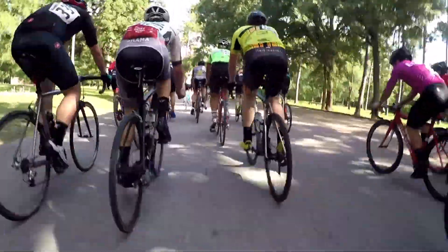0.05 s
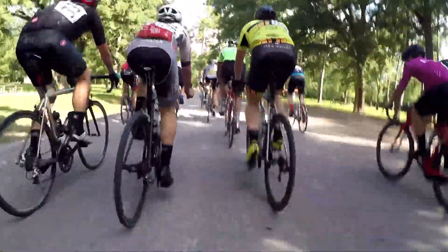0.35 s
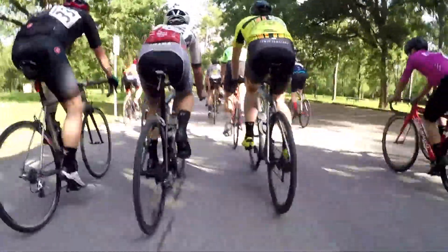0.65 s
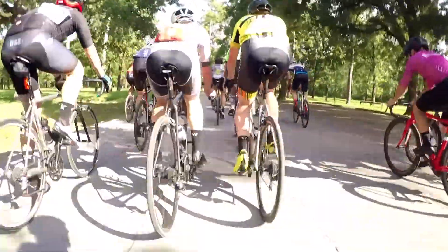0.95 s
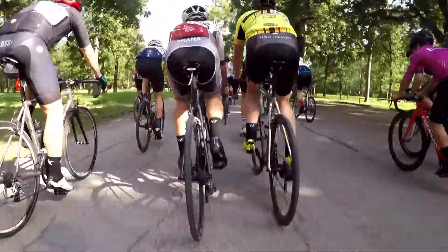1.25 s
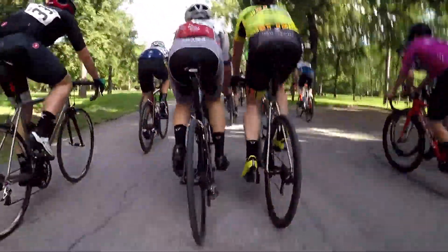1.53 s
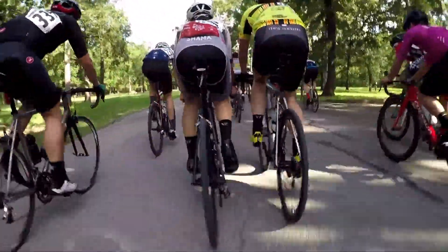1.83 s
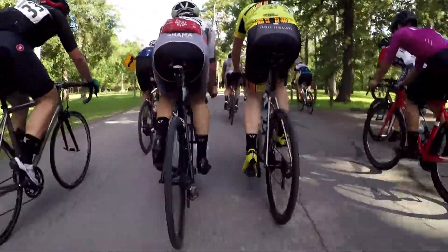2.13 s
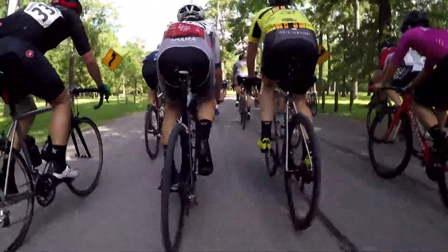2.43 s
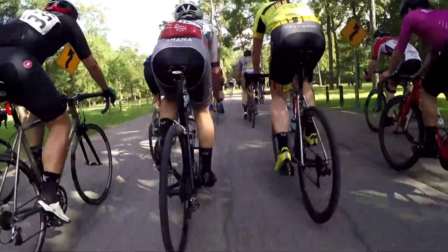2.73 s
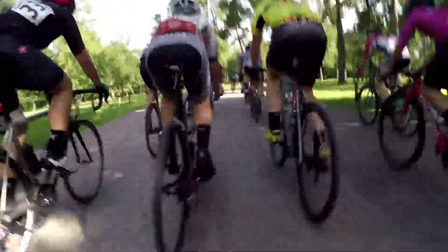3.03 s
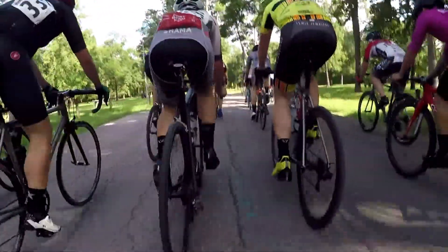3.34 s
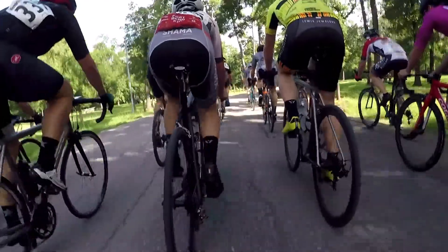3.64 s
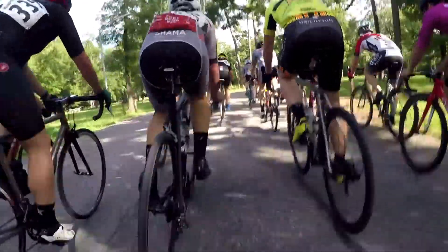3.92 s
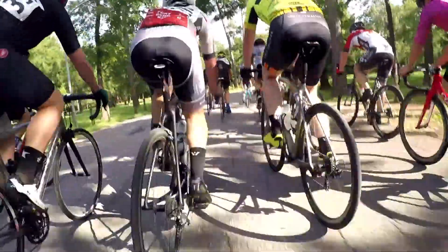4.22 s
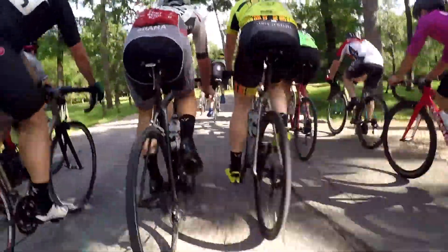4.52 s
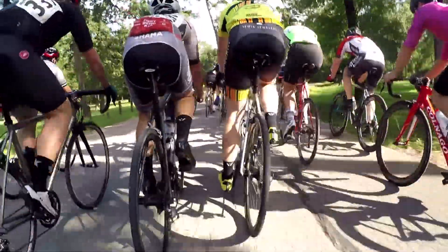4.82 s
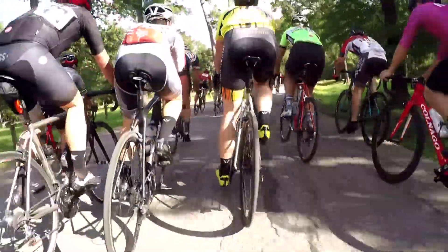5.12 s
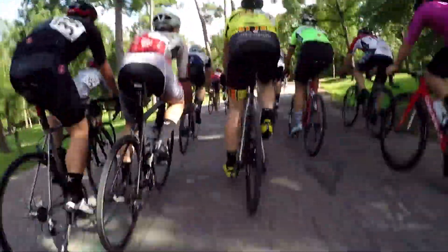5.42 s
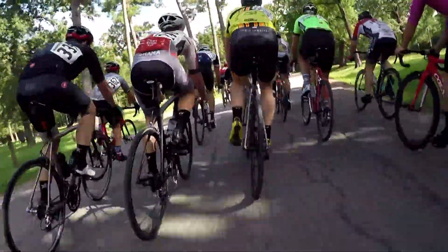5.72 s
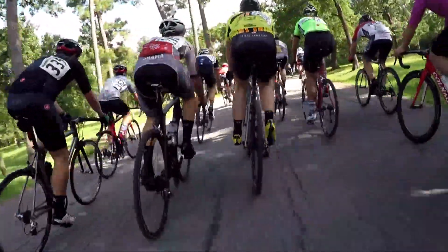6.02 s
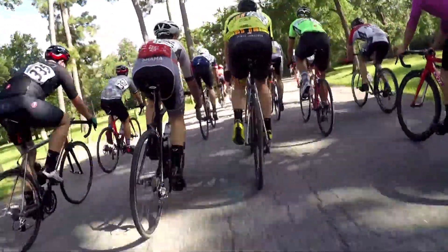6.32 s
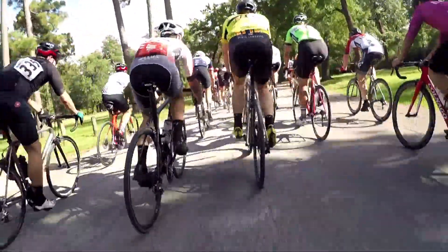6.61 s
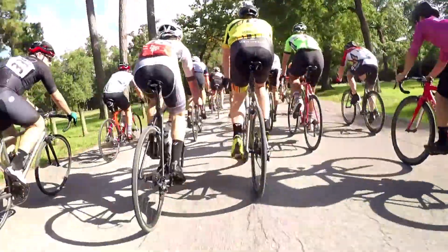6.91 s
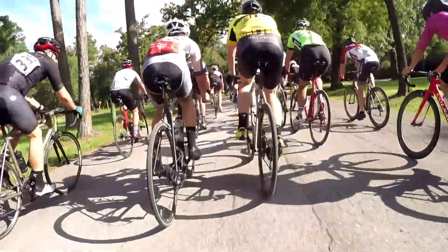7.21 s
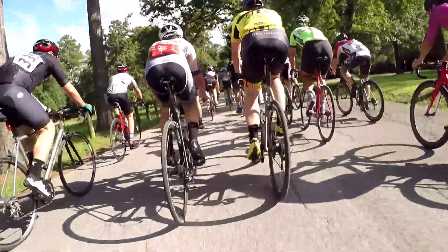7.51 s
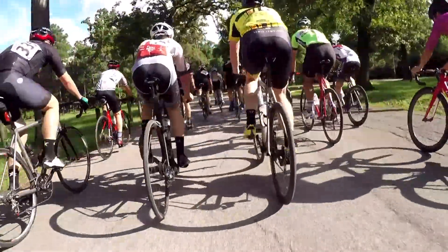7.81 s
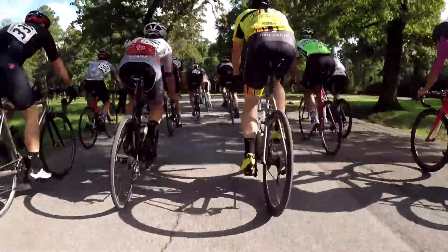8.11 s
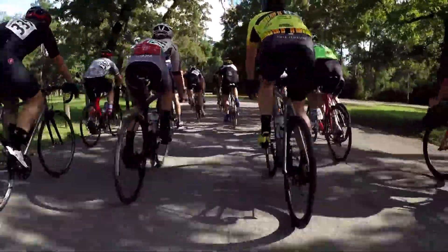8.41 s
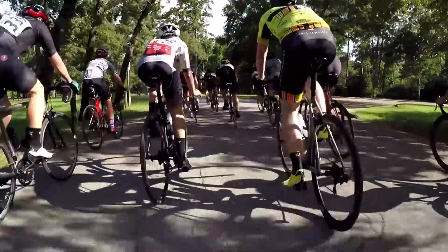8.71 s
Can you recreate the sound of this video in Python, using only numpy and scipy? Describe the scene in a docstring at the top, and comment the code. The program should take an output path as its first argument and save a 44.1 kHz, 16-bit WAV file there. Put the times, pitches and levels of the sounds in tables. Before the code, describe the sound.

Throughout, uneven wind buffets a microphone mounted on a moving bicycle, over a deep shudder from the frame and the drumming of rough asphalt. The tyres of the surrounding riders roar softly and their chains hiss. At about 0.5 seconds a crack sets off a quick cluster of hollow knocks and sharp rattling ticks. A faint, very brief brake squeak follows at 1.3 seconds. The hardest jolt and rattle comes with a gust around 3 seconds, with more near 3.9 and 5.4 seconds and lighter knocks at 4.7. From about 4 to 6.4 seconds freewheels buzz and sizzle as riders coast. The wind eases briefly after 5.5 seconds, then slaps back with knocks between 6.2 and 6.4. Another gust and knock land at 7.7 seconds, grit pings off a spoke just before 8, and the freewheels sizzle again at the end, near 8.7 seconds.

```python
"""Riding in a bunch of road cyclists

A camera in a plastic case rides on a bicycle. The frame shudders, eddies buffet the case, rough
asphalt drums through the mount and cracks make it knock and rattle. Around it tyres roar, chains
hiss and freewheels sizzle as riders coast; grit pings off a spoke and a brake squeaks once."""
import sys
import numpy as np
from scipy import signal
from scipy.fft import rfft, irfft
from scipy.io import wavfile
from scipy.ndimage import uniform_filter1d, minimum_filter1d, map_coordinates

SR = 44100
rng = np.random.default_rng(int(sys.argv[2]) if len(sys.argv) > 2 else 0)


def int16_out(signal):
    """Quantize to a 16-bit WAV file."""
    q = np.round(np.clip(np.atleast_2d(signal).T, -1, 1) * 32767)
    wavfile.write(sys.argv[1], SR, q.astype(np.int16))


N = 385875

# Spectrum of the shaking frame. Each row: frequency in Hz, relative level in dB.
SHUDDER_SPECTRUM = [(8, -16.5), (20, -1.5), (28, -4), (36, 3.5), (43, -0.5), (51, -2.5), (63, -6.5),
                    (90, -15.5), (200, -92), (2000, -140)]
# Spells of harder or softer shaking. Each row: middle in seconds, length in seconds, change in dB.
SHAKE_SPELLS = [(0.42, 0.35, 1.5), (0.75, 0.4, -1), (1.25, 0.35, -1), (1.75, 0.4, 1), (2.12, 0.42, -1),
                (3.62, 0.22, 2), (4.45, 0.3, 3.5), (4.9, 0.35, 1), (6.45, 0.3, -1.5), (7.33, 0.15, 3.5)]

def shudder(rough_db):
    """Forced vibration: the road shakes frame and mount at a few dozen cycles a second."""
    level_db = -22 + 0.33 * rough_db + swells(SHAKE_SPELLS)
    return undb(level_db) * steady(colour(noise(), SHUDDER_SPECTRUM), seconds=0.087)


# Spectrum of the buffeting. Each row: frequency in Hz, relative level in dB.
BUFFET_SPECTRUM = [(35, -39), (70, -1.5), (115, -3.5), (165, -5), (210, -4.5), (255, -9), (300, -17),
                   (500, -22), (1000, -29.5), (3000, -66), (10000, -100)]
# Gusts and slipstream lulls. Each row: middle in seconds, length in seconds, change in dB.
GUSTS = [(0.95, 0.6, -3.5), (2.87, 0.33, 5), (3.8, 0.35, 5.5), (4.67, 0.22, 5.5), (5.02, 0.37, -5.5),
         (5.35, 0.047, 9), (5.56, 0.35, -12.5), (5.94, 0.43, -5.5), (6.33, 0.28, 1.5), (6.7, 0.49, 1),
         (7.25, 1, 3), (7.6, 0.078, 5.5)]
# The wind's bass as riders ahead shift. Each row: middle in seconds, length in seconds, change in dB.
BASS_SPELLS = [(1.1, 0.97, 4), (2.0, 1.5, -2), (3.3, 0.77, 2.5), (4.7, 0.6, 1.5), (6.4, 1.3, 3)]

def wind():
    """Turbulence: eddies hit the case in quick, uneven puffs, and larger ones deepen the buffeting."""
    level_db = -27.5 + swells(GUSTS) + walk(8)
    puffs = noise() * undb(3.3 * walk(41))
    buffet = steady(colour(puffs, BUFFET_SPECTRUM), seconds=0.09)
    bass = signal.sosfiltfilt(signal.butter(2, 132, fs=SR, output="sos"), buffet)
    return undb(level_db) * (buffet + (undb(swells(BASS_SPELLS)) - 1) * bass)


# Modes of case and mount. Each row: frequency in Hz, 60 dB decay time in seconds, relative level in dB.
CASE_MODES = [(261, 0.069, -7), (326, 0.053, 0), (376, 0.072, -0.5), (411, 0.094, -3.5), (461, 0.037, 0.5),
              (550, 0.067, -15.5), (661, 0.017, -7), (788, 0.014, -7), (853, 0.017, -18),
              (955, 0.023, -9.5), (1364, 0.038, -23.5), (1690, 0.025, -25), (2520, 0.0068, -31)]
# Response of the soft rubber contact. Each row: frequency in Hz, relative level in dB.
RUBBER_RESPONSE = [(2000, -8), (3200, -3), (6000, -19), (12000, -45)]

def road(rough_db):
    """Resonance under random impacts: grit drums on the case, and the flexing mount bends its pitch."""
    grains_per_s, flex = 1500, .035
    grit = noise() * (rng.random(N) < grains_per_s / SR) * undb(2.0 * walk(30))
    ringing = signal.fftconvolve(grit, modal_ring(CASE_MODES, scatter=0))[:N]
    drumming = colour(ringing, RUBBER_RESPONSE)
    pitch_ratio = 1 + flex * walk(9)
    bent = map_coordinates(drumming, [np.cumsum(pitch_ratio)], mode="mirror")
    return undb(-37 + rough_db) * steady(bent, seconds=0.036)


# Jolts from cracks. Each row: start in seconds, level in dB, upper modes relative to that in dB.
JOLTS = [(0.455, -16.5, -12), (0.467, -16, -10), (0.478, -16.5, -4), (0.494, -16, -18), (0.534, -17, -9),
         (2.849, -18, 2), (2.908, -15.5, -11), (2.961, -16, -13), (2.977, -14.5, -2), (2.984, -10, -4),
         (3.005, -14, -7), (3.043, -18, -2), (3.156, -23, -4), (3.864, -14, -3), (3.872, -16, -10),
         (3.969, -14, -6), (4.626, -23, 3), (4.704, -20, -3), (4.841, -19, -7), (5.356, -18, 1),
         (5.364, -12.5, -4), (5.386, -11.5, -3), (5.403, -16, -14), (5.784, -16, -12), (6.207, -19, -2),
         (6.371, -17.5, -3), (6.4, -17.5, -4), (6.443, -19.5, -1), (7.686, -18, -2)]

def knocks():
    """Impulse response: a jolt excites the low modes of the mount and the upper modes of the case."""
    out = np.zeros(N)
    split_hz, rubber_rise_s = 650, .0015
    mount = [mode for mode in CASE_MODES if mode[0] < split_hz]
    shell = [mode for mode in CASE_MODES if mode[0] >= split_hz]
    for start, db, upper_db in JOLTS:
        thud, ring = modal_ring(mount, scatter=0.88), modal_ring(shell, scatter=0.74)
        give = 1 - np.exp(-np.arange(len(thud)) / SR / rubber_rise_s)
        add(out, start, undb(db) * (give * thud + undb(upper_db) * ring))
    return out


# Loudness of the group. Each row: time in seconds, relative tyre and chain levels in dB.
BUNCH_LEVELS = [(0, -39.5, -47.5), (0.3, -41, -48.5), (0.7, -42.5, -52), (1.4, -41, -49), (2.8, -40, -48.5),
                (3.3, -43, -53.5), (4.2, -41.5, -47.5), (5.2, -43, -47.5), (6.5, -43, -51.5),
                (7.2, -44, -50.5), (8, -45, -52.5), (8.75, -43.5, -49)]
# Spectra of the tyres and the chains. Each row: frequency in Hz, relative level in dB.
TYRE_SPECTRUM = [(200, -43), (430, 18.5), (640, -2.5), (780, 7.5), (860, 13), (925, 7), (995, 13),
                 (1060, 8.5), (1140, 3.5), (1500, 2), (1700, 3.5), (2150, -5.5), (2700, -5.5), (3100, -16),
                 (4500, -25), (9000, -64)]
CHAIN_SPECTRUM = [(2000, -6), (3500, -8), (4100, 1), (4600, 1.5), (5500, -2.5), (6400, -2.5), (7600, -10),
                  (9000, -13.5), (11200, -25), (15000, -41)]
# Swells and dips of the roar. Each row: middle in seconds, length in seconds, change in dB.
TYRE_SWELLS = [(0.75, 0.33, -0.5), (1.2, 0.36, 1), (1.46, 0.17, -3.5), (2.02, 0.1, -2), (2.25, 0.3, 0),
               (4.3, 0.25, -1.5), (4.55, 0.23, 1.5), (4.8, 0.19, -3.5), (5.15, 0.25, 1.5), (5.95, 0.25, 0),
               (7.35, 0.35, 1), (8.3, 0.25, -0.5), (8.6, 0.28, 0)]

def bunch(rough_db):
    """Rolling noise: tyres roar and pedal strokes modulate the chains' hiss; rough road lifts both."""
    tyre_gain, chain_gain = gains(BUNCH_LEVELS)
    tyres = colour(noise(), TYRE_SPECTRUM)
    tyres *= undb(0.32 * walk(43) + 0.054 * rough_db + swells(TYRE_SWELLS))
    strokes = np.cumsum(2.8 * (1 + .1 * walk(1))) / SR
    pedal_db = .45 * np.sin(2 * np.pi * strokes) + .4 * walk(14)
    grain = noise() * undb(1.24 * walk(320))
    chains = colour(grain, CHAIN_SPECTRUM) * undb(pedal_db + 0.27 * rough_db)
    return undb(4.5) * tyre_gain * tyres + undb(-1.25) * chain_gain * chains


# The hardest eddies. Each row: middle in seconds, length in seconds, level in dB.
EDDIES = [(2.87, .06, -28), (4.69, .09, -32), (6.2, .12, -31), (6.211, .035, -28), (6.386, .04, -28),
          (6.402, .016, -26), (7.702, .11, -31), (8.32, .12, -34)]
# Spectrum of their bursts. Each row: frequency in Hz, relative level in dB.
SLAP_SPECTRUM = [(80, -10), (200, -3), (400, -3), (600, -4), (900, -1), (1200, -10), (1600, -19),
                 (2400, -34), (6000, -60)]

def slaps():
    """Pressure transients: eddies strike the case head-on, brief and brighter than the buffeting."""
    out = np.zeros(N)
    air = steady(colour(noise(), SLAP_SPECTRUM), seconds=.01)
    for middle, length, db in EDDIES:
        first = int((middle - length / 2) * SR)
        arch = np.hanning(int(length * SR))
        add(out, first / SR, undb(db) * arch * air[first:first + len(arch)])
    return out


# The hardest ticks. Each row: start in seconds, then relative level, treble snap and low clack in dB.
HARD_TICKS = [(0.4556, -19, -26, 2), (0.4648, -18, -22, 3), (0.4806, -19, -29, 8), (0.487, -27, -21, 0),
              (0.492, -28, -21, 4), (0.5062, -25, -30, 5), (0.52, -31, -26, 6), (0.5335, -25, -30, 9),
              (2.9206, -28, -23, 0), (2.9612, -15, -29, -9), (2.965, -23, -30, 5), (2.977, -17.5, -9, 0),
              (2.9836, -13.5, -29, 0), (2.9985, -27, -21, -4), (3.0069, -24, -27, -4),
              (3.017, -23.5, -20, -2), (3.0395, -29, -26, -4), (3.0448, -25, -27, 5), (3.0619, -27, -28, 0),
              (3.1206, -28.5, -25, -3), (3.8644, -22, -19, 2), (3.8705, -24, -28, 8), (3.97, -26, -24, -4),
              (5.2505, -25, -22, 0), (5.2535, -27, -28, 8), (5.3428, -25, -24, 0), (5.3566, -19.5, -8, 8),
              (5.3639, -13, -27, 4), (5.386, -22.5, -28, 4), (5.7955, -28, -26, -6), (5.836, -27, -24, -6),
              (6.262, -27.5, -20, -6), (6.288, -29, -24, -6)]
# Spectra of a tick's body and its snap. Each row: frequency in Hz, relative level in dB.
TICK_SPECTRUM = [(800, -26), (2000, 10), (3300, -1.5), (4400, 7), (5300, 8), (6500, 1), (8000, -6),
                 (11000, -20), (15000, -34)]
SNAP_SPECTRUM = [(2000, -20), (6000, -4), (9000, -1), (12000, 0), (16000, -3)]
# Scrapes of loose parts. Each row: start in seconds, length in seconds, level in dB.
SCRAPES = [(0.423, 0.036, -35.5), (1.229, 0.033, -45), (5.342, 0.015, -37), (5.371, 0.011, -41),
           (5.634, 0.026, -42.5), (6.638, 0.023, -41)]

def rattles(rough_db):
    """Inelastic impact and friction: loose joints tick, rebound twice with loss, and scrape."""
    out = np.zeros(N)
    clack_below_hz, rebound_gap_s, rebound_db = 3000, .005, -14
    t = np.arange(SR // 40) / SR
    # the snap dies at once, the body rings on for a few milliseconds
    contact = np.exp(-((t - .001) / .0004) ** 2)
    ringing = (1 - np.exp(-t / .0008)) ** 2 * (np.exp(-t / .0008) + .02 * np.exp(-t / .005))
    ringing /= ringing.max()
    for start, db, snap_db, clack_db in list(HARD_TICKS) + chatter(rough_db):
        spectrum = [(hz, level + clack_db * (hz < clack_below_hz)) for hz, level in TICK_SPECTRUM]
        body = burst(t, spectrum) * ringing
        snap = undb(snap_db + 7) * burst(t, SNAP_SPECTRUM) * contact
        add(out, start, undb(db - 11) * (body + snap))
        delays = np.cumsum(rebound_gap_s * rng.uniform(.5, 1.5, 2))
        for k, delay in enumerate(delays, 1):
            add(out, start + delay, undb(db - 13 + k * rebound_db) * burst(t, TICK_SPECTRUM) * ringing)
    for start, length, db in SCRAPES:
        arch = np.hanning(int(length * SR))
        add(out, start, undb(db) * arch * burst(arch, TICK_SPECTRUM))
    return out


def chatter(rough_db):
    """A Poisson process: rows of lesser ticks, which come more often the rougher the road."""
    ticks_per_s = 1.5 * rough_db
    onsets = np.flatnonzero(rng.random(N) < ticks_per_s / SR)
    return [(i / SR, -35.5 + 2 * size, -27, 0) for i, size in zip(onsets, noise()[onsets])]


# Loudness of the coasting hubs and of one close hub. Each row: time in seconds, relative level in dB.
COAST_LEVELS = [(0.05, -72), (0.36, -68), (0.97, -72), (1.43, -64), (2.28, -74), (2.96, -65), (3.2, -75),
                (3.71, -65), (4.0, -74), (4.5, -63), (4.89, -57), (6.08, -52.5), (6.2, -65), (6.32, -62),
                (6.45, -80.5), (7.97, -64.5), (8.36, -57.5), (8.58, -64), (8.75, -54)]
CLOSE_LEVELS = [(0, -71), (3.4, -58), (4.0, -49), (5.3, -46), (5.4, -59), (6.1, -53), (6.4, -60),
                (8.3, -80), (8.75, -50)]
# Spectra of the blurred hubs and the close pawls. Each row: frequency in Hz, relative level in dB.
SIZZLE_SPECTRUM = [(5000, -24), (8500, -14), (10000, -21), (11300, -32), (12000, -11.5), (12700, -8.5),
                   (14000, -9), (15300, -14.5)]
PAWL_SPECTRUM = [(3000, -12), (4400, -6), (5130, -1.5), (5560, 1), (6350, 1.5), (7800, -3), (8500, -9),
                 (9050, -5), (10000, -13.5), (11000, -22), (15000, -33)]
# Resonances of the hub shell. Each row: frequency in Hz, bandwidth in Hz, relative level in dB.
HUB_MODES = [(5332, 45, 0), (6330, 260, 0)]

def freewheels():
    """Superposed pulse trains: hubs blur into a sizzle; a close one buzzes and its shell resonates."""
    hubs = pawls(rate_hz=151, decay_teeth=.6, scatter_db=2.0)
    hubs += pawls(rate_hz=228, decay_teeth=.7, scatter_db=2.0)
    close = pawls(rate_hz=280, decay_teeth=4.0, scatter_db=1.5)
    shell = sum(undb(db) * unit(signal.lfilter(*signal.iirpeak(hz, hz / width, SR), close))
                for hz, width, db in HUB_MODES)
    sizzle = colour(hubs, SIZZLE_SPECTRUM)
    buzz = colour(close, PAWL_SPECTRUM) + .4 * unit(shell)
    return undb(1.5) * gains(COAST_LEVELS)[0] * sizzle + undb(-1) * gains(CLOSE_LEVELS)[0] * buzz


def pawls(rate_hz, decay_teeth, scatter_db):
    """Repeated impact: pawls drop over ratchet teeth, with an uneven spray of noise at each."""
    teeth = np.cumsum(rate_hz * (1 + 0.12 * walk(28))) / SR
    return noise() * np.exp(-(teeth % 1) / decay_teeth) * undb(scatter_db * walk(200))


# Strikes on a spoke. Each row: start in seconds, peak level in dB.
SPOKE_STRIKES = [(7.9455, -26), (7.952, -38)]
# Modes of the spoke. Each row: frequency in Hz, 60 dB decay time in seconds, relative level in dB.
SPOKE_MODES = [(4441, .016, -4), (5055, .014, 0), (5460, .012, -2), (5850, .01, -3), (6368, .012, -4)]

def pings():
    """Free vibration: a spoke rings when grit flung from a tyre strikes it."""
    out = np.zeros(N)
    for start, db in SPOKE_STRIKES:
        add(out, start, undb(db) * modal_ring(SPOKE_MODES, scatter=.3))
    return out


def squeak():
    """Friction-driven vibration: a brake pad touches a rim in one rough, falling chirp."""
    out = np.zeros(N)
    start_s, length_s, pitch_hz, fall_hz_per_s = 1.267, .023, 2480, 14000
    t = np.arange(int(length_s * SR)) / SR
    hz = (pitch_hz - fall_hz_per_s * t) * (1 + .11 * walk(500)[:len(t)])
    chirp = np.sin(2 * np.pi * np.cumsum(hz) / SR)
    add(out, start_s, undb(-37) * np.hanning(len(t)) * chirp)
    return out


def modal_ring(modes, scatter):
    """Modal superposition: damped sines, with level, tuning and sign scattered at each blow; peak 1."""
    t = np.arange(SR // 8) / SR
    chance = rng.standard_normal((len(modes), 3)) * scatter * [2, .02, 2]
    ring = np.zeros(len(t))
    for (hz, t60, db), (extra_db, detune, push) in zip(modes, chance):
        amplitude = np.sign(1 + push) * undb(db + extra_db)
        ring += amplitude * np.sin(2 * np.pi * hz * (1 + detune) * t) * np.exp(-np.log(1000) * t / t60)
    return ring / np.abs(ring).max()


def burst(t, spectrum):
    """Coloured noise of even strength, as long as t."""
    return steady(colour(rng.standard_normal(len(t)), spectrum), seconds=.001)


def swells(table):
    """Level change in dB: a sum of cosine arches, one for each row of middle, length and height."""
    t = np.arange(N) / SR
    return sum(db * np.cos(np.pi * np.clip((t - middle) / length, -.5, .5))
               for middle, length, db in table)


def gains(table):
    """Interpolation in time: one gain curve for each dB column of a table."""
    times, *columns = np.transpose(table)
    return [undb(np.interp(np.arange(N) / SR, times, db)) for db in columns]


def colour(x, spectrum):
    """Spectral shaping by points of frequency and level; rms 1."""
    hz, db = np.transpose(spectrum)
    bins = np.maximum(np.fft.rfftfreq(len(x), 1 / SR), 1)
    response = undb(np.interp(np.log(bins), np.log(hz), db))
    return unit(irfft(rfft(x) * response, len(x)))


def walk(bandwidth_hz):
    """Low-passed noise: a smooth random wander of rms 1."""
    response = np.exp(-(np.fft.rfftfreq(N, 1 / SR) / bandwidth_hz) ** 2)
    return unit(irfft(rfft(noise()) * response, N))


def steady(x, seconds):
    """Division by the running rms takes out swells slower than the given time."""
    return x / np.sqrt(uniform_filter1d(x ** 2, int(seconds * SR)) + 1e-9)


def noise():
    """White noise."""
    return rng.standard_normal(N)


def undb(db):
    """Decibels to gain."""
    return 10 ** (np.asarray(db) / 20)


def unit(x):
    """Scale to rms 1."""
    return x / np.sqrt(np.mean(x ** 2))


def add(out, start_s, sound):
    """Mix a sound in at a time."""
    i = int(start_s * SR)
    out[i:i + len(sound)] += sound[:max(N - i, 0)]


# Patches of asphalt. Each row: middle in seconds, length in seconds, change of the drumming in dB.
ROAD_PATCHES = [(0.43, 0.35, 10), (1.24, 0.26, 7.5), (1.54, 0.21, 5.5), (2.33, 0.97, 4), (2.92, 0.47, 10.5),
                (3.19, 0.25, 6.5), (3.82, 0.44, 4.5), (3.98, 0.087, 10), (4.65, 0.64, 2.5), (5.09, 0.1, 8),
                (5.3, 0.23, 7), (5.78, 0.18, 7), (6.2, 0.11, 5.5), (6.4, 0.078, -5), (7.1, 0.98, 3.5),
                (7.69, 0.25, 4), (8.3, 0.21, 5.5)]

def scene():
    """Superposition at one microphone; the road's roughness drives the bike, the bunch and rattles."""
    rough_db = swells(ROAD_PATCHES)
    bed = shudder(rough_db) + road(rough_db) + wind() + bunch(rough_db) + freewheels()
    events = knocks() + slaps() + pings() + squeak() + rattles(rough_db)
    return (bed + events)[None]


def record(dry):
    """Peak limiting: the camera holds down the loudest jolts, lets go slowly and cuts the top."""
    ceiling, look_ahead, release_db_per_s, top_hz = .41, int(0.0022 * SR), 45, 15400
    over_db = 20 * np.log10(np.maximum(np.abs(dry) / ceiling, 1))
    release = release_db_per_s * np.arange(N) / SR
    needed = undb(release - np.maximum.accumulate(over_db + release, axis=1))
    gain = uniform_filter1d(minimum_filter1d(needed, look_ahead), look_ahead)
    return signal.sosfilt(signal.ellip(10, .2, 80, top_hz, fs=SR, output="sos"), dry * gain)


dry = scene()
out = record(dry)
int16_out(out)
```